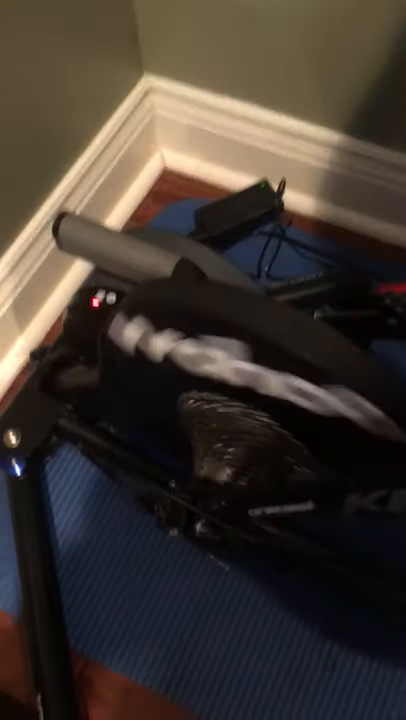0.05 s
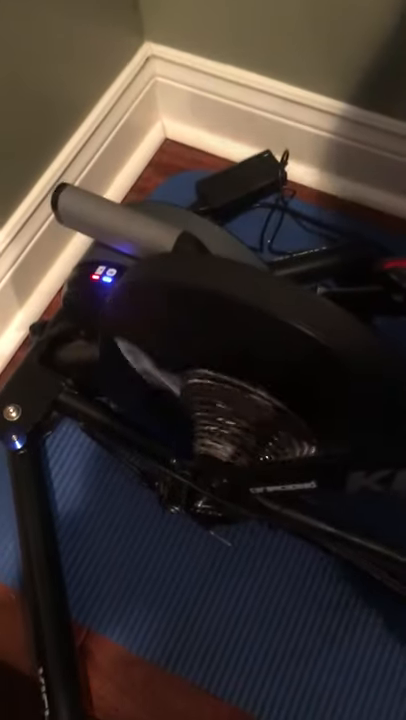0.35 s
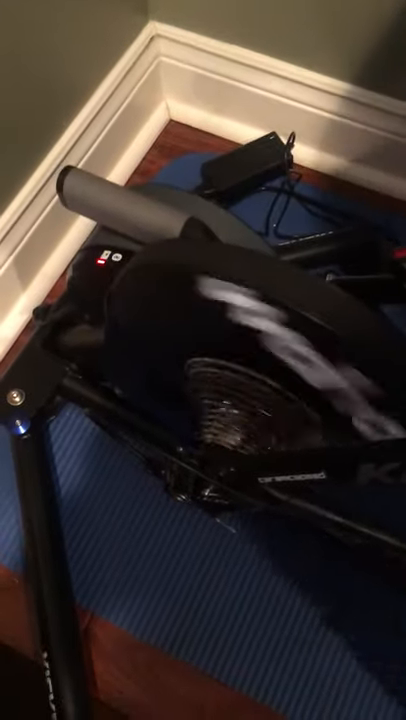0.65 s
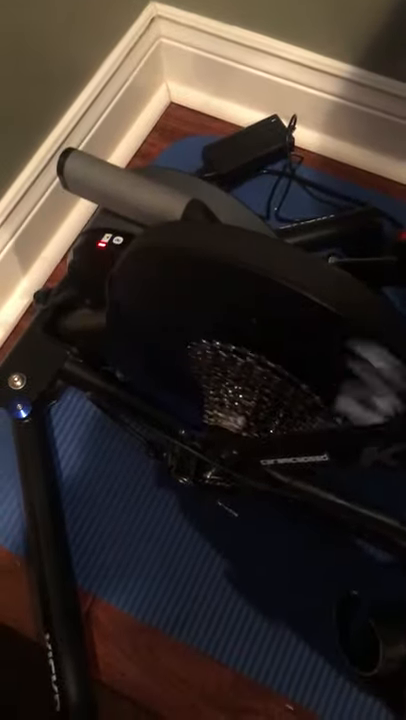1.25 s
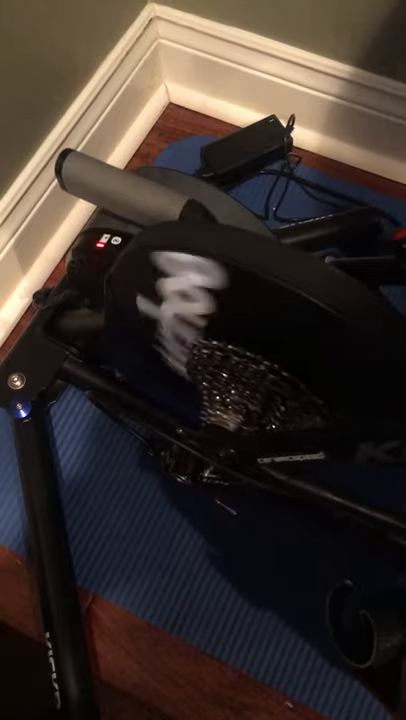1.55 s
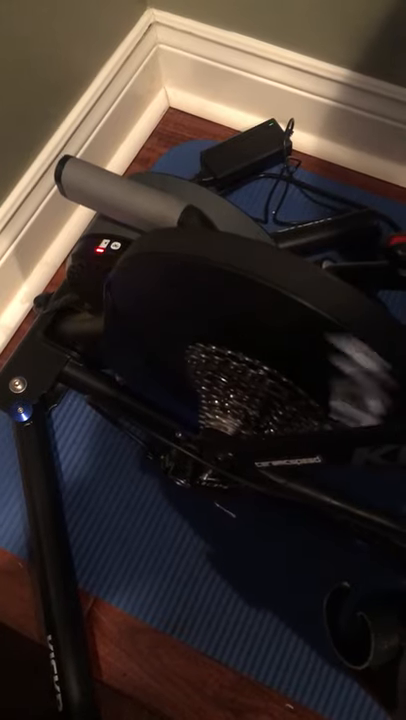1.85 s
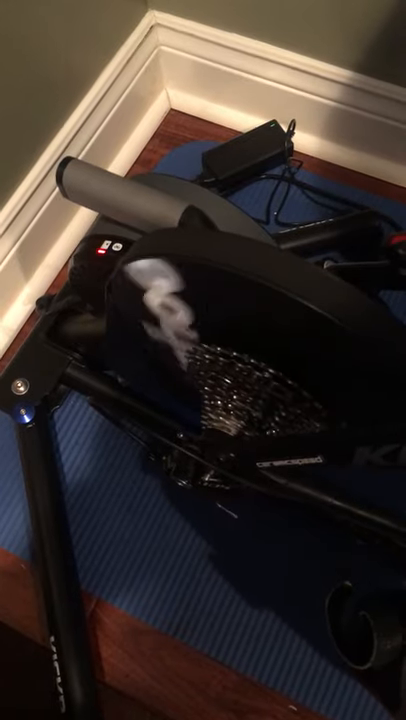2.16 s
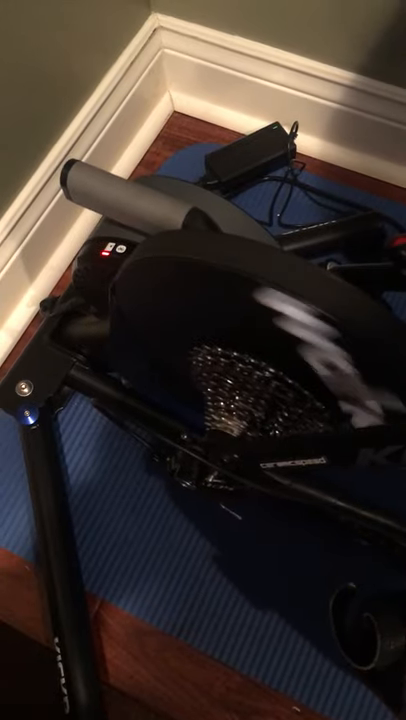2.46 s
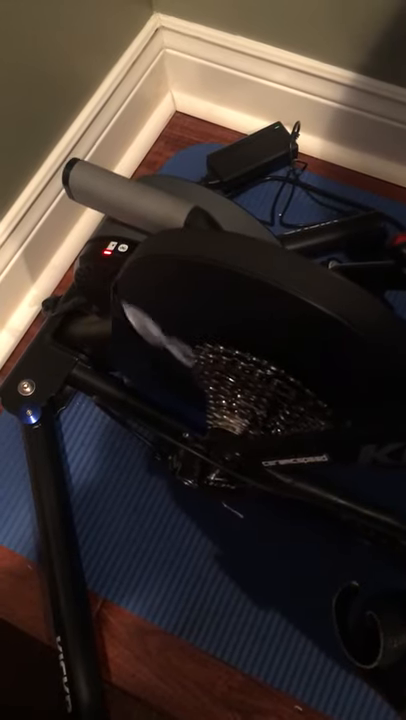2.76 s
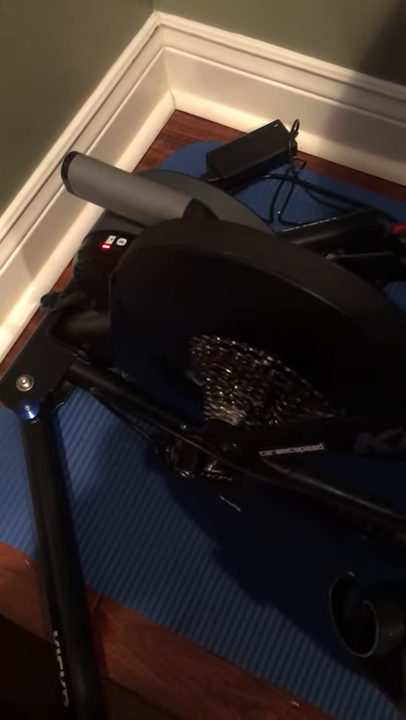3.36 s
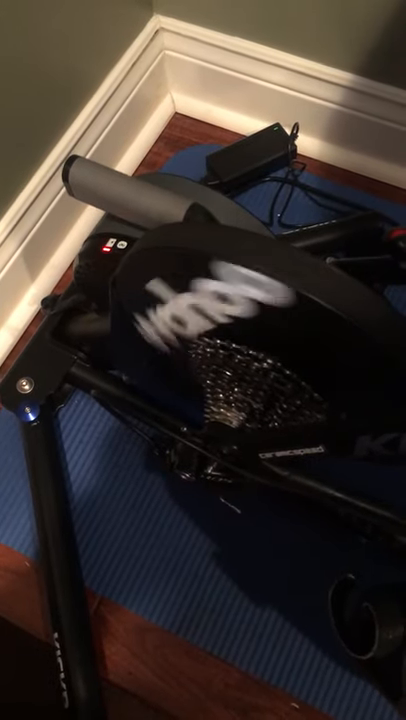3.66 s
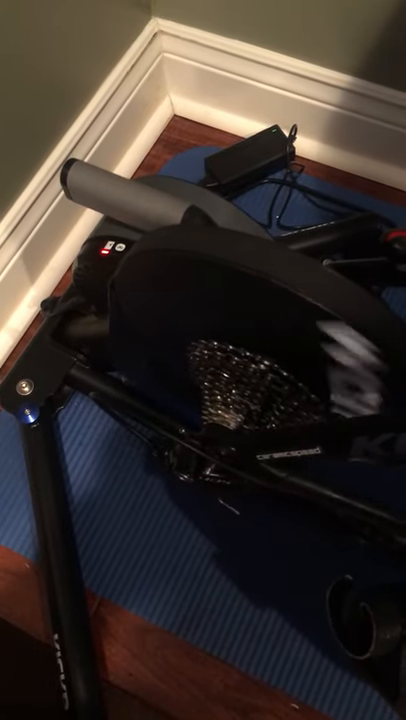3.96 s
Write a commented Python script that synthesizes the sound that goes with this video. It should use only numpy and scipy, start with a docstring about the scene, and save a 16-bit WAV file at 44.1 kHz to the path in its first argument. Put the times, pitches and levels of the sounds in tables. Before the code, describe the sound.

A bicycle freewheel ticks rapidly on an indoor trainer, starting after a second of chain rattle. Underneath, the slowing flywheel hums and knocks softly, heard from about a metre in a small room.

```python
"""A small room with an indoor bike trainer in the corner, heard from about a metre.
The chain rattles while the rider pedals. Then the pedals stop, and the freewheel's pawls (small
catches) tick over its teeth, making the sprockets ring. All along, the heavy flywheel slowly
runs down, humming and knocking in the frame about once a turn."""
import sys
import numpy as np
from scipy import signal
from scipy.fft import rfft, irfft
from scipy.io import wavfile

SR = 44100
rng = np.random.default_rng(int(sys.argv[2]) if len(sys.argv) > 2 else 0)


def put_to_file(sound):
    """Save the sound as 16-bit audio at rate SR, in the file named by the first command-line argument."""
    columns = np.atleast_2d(sound).T  # one column per channel
    safe = np.clip(columns, -1, 1)
    whole_steps = np.round(safe * 32767)
    wavfile.write(sys.argv[1], SR, whole_steps.astype(np.int16))


N = 176400
T = np.arange(N) / SR

# knocks of the turning flywheel: start_s, level_db
FLYWHEEL_KNOCKS = [(0.023, -31), (0.094, -28), (0.168, -29), (0.241, -24), (0.272, -26), (0.314, -22),
                   (0.347, -26), (0.385, -23), (0.424, -26), (0.46, -24), (0.494, -24), (0.536, -24),
                   (0.574, -27), (0.609, -22), (0.642, -19), (0.685, -24), (0.716, -23), (0.757, -28),
                   (0.832, -25), (0.867, -23), (0.905, -21), (0.939, -24), (0.978, -24), (1.059, -25),
                   (1.137, -27), (1.217, -25), (1.297, -29), (1.378, -29), (1.459, -32), (1.543, -31),
                   (1.63, -28), (1.715, -29), (1.802, -29), (1.842, -30), (1.931, -29), (2.02, -27),
                   (2.111, -30), (2.194, -28), (2.25, -32), (2.342, -30), (2.434, -32), (2.474, -33),
                   (2.528, -31), (2.619, -37), (2.666, -33), (2.761, -35), (2.853, -32), (2.954, -37),
                   (3.004, -35), (3.046, -35), (3.203, -37), (3.293, -36), (3.393, -33), (3.493, -35),
                   (3.549, -31), (3.651, -29), (3.756, -28), (3.863, -25), (3.967, -26)]
# the dull tone of the housing when it is struck: pitch_hz, gain_db
HOUSING_TONE = [(500, -34.5), (930, 1.5), (1100, 3.5), (1300, 6), (1480, -6.5), (1720, 5.5), (2000, 3.5),
                (2650, 2), (3000, -7.5), (4500, -7), (7000, -18.5)]


def undb(db):
    """Turn decibels into a number to multiply by."""
    return 10 ** (np.asarray(db) / 20)


def unit(x):
    """Scale a sound to an average strength (rms) of 1."""
    return x / np.sqrt(np.mean(x ** 2))


def curve(rows):
    """Join (time_s, value) rows by straight lines."""
    return np.interp(T, *np.array(rows).T)


def noise():
    """An even hiss: white noise."""
    return rng.standard_normal(N)


def response(hz, rows):
    """Look up the gain at given pitches in a (pitch_hz, gain_db) table."""
    pitch_hz, gain_db = np.array(rows).T
    return undb(np.interp(np.log(hz + 1), np.log(pitch_hz), gain_db))


def ring(x, tail):
    """Make every sample of x set off a copy of the tail."""
    return signal.fftconvolve(x, tail)[:N]


def colour(x, rows, size=4096):
    """Filter a sound to the tone of a (pitch_hz, gain_db) table."""
    gains = response(np.arange(size // 2 + 1) * SR / size, rows)
    cepstrum = irfft(np.log(gains))
    # this fold makes the filter ring only after a hit, never before it
    cepstrum[1:size // 2] *= 2
    cepstrum[size // 2 + 1:] = 0
    return ring(x, irfft(np.exp(rfft(cepstrum))))


def taps(times, sizes):
    """One sharp spike at each time."""
    samples = np.clip(np.asarray(times) * SR, 0, N).astype(int)
    return np.bincount(samples, sizes, N + 1)[:N]


def fade(x, decay_s):
    """Give every spike a tail that dies away."""
    return signal.lfilter([1], [1, -np.exp(-1 / (decay_s * SR))], x)


def modes(rows):
    """The notes of a struck object; each falls by 60 dB in its ring_s."""
    t = T[:SR // 2]
    return sum(undb(db) * np.sin(2 * np.pi * hz * t) * np.exp(-np.log(1000) * t / ring_s)
               for hz, db, ring_s in rows)


def room(x, first_echo_s=.0022, ring_s=.093, echo_db=-14.5):
    """The walls add a short wash of echoes."""
    t = T[:SR // 2]
    tail = rng.standard_normal(len(t)) * np.exp(-np.log(1000) * t / ring_s) * (t > first_echo_s)
    return x + undb(echo_db) * ring(x, tail / np.sqrt(np.sum(tail ** 2)))


def cover(x, ring_db=-3):
    """The plastic cover rings along with sound that passes through it."""
    # notes of the cover: pitch_hz, level_db, ring_s
    cover_notes = [(886, -15, 0.3), (934, 10, 0.033), (1008, -6.5, 0.34), (1265, -2.5, 0.027),
                   (1364.6, -5, 0.16), (1542, -5, 0.19), (1705, -6, 0.11), (1799, 6.5, 0.027),
                   (2056, -3, 0.084), (2213, 0, 0.075), (2750, 17.5, 0.02)]
    ringing = unit(ring(x, modes(cover_notes)))
    return unit(unit(x) + undb(ring_db) * ringing)


def floor_boom(level_db=-46.5):
    """The floor under the trainer shakes faintly and unevenly."""
    # tone of the floor: pitch_hz, gain_db
    floor_tone = [(20, -59), (32, -27), (43, -40), (52, -12), (62, 10.5), (73, -26.5), (85, -6.5),
                  (106, -13), (125, -17.5), (200, -36)]
    return unit(colour(noise(), floor_tone)) * undb(level_db)


def belt_whirr(gain_db=-3.5):
    """The belt and moving air hiss through the cover."""
    # tone of the whirr: pitch_hz, gain_db
    whirr_tone = [(150, -3), (300, -38), (520, -13.5), (700, -37), (820, -10), (950, -1), (1100, -4),
                  (1340, -1), (1470, -5), (1700, -6), (1950, -4), (2250, -4), (2650, -10.5), (2900, -11),
                  (4300, -7.5), (7000, -11), (16000, -20.5)]
    # its rise and fall: time_s, level_db
    whirr_levels = [(0.0, -38), (0.52, -38), (0.92, -42), (3.12, -47), (3.34, -43), (4.0, -43)]
    return cover(colour(noise(), whirr_tone)) * undb(curve(whirr_levels) + gain_db)


def shaft_hum(speed, turns, fifth_boost_db=7, gain_db=-.5):
    """The shaft hums at multiples of its turning rate: the fifth leads, then the sixth as it slows."""
    # how well frame and floor carry each pitch: pitch_hz, gain_db
    hum_tone = [(30, -30), (42, -8), (52, -22.5), (60, 8.5), (67, 5), (76, -6), (88, -23), (107, 1.5),
                (125, -17.5), (160, -8)]
    # rise and fall of the hum: time_s, level_db
    hum_levels = [(0.0, -39.5), (0.62, -38.5), (0.69, -43.5), (0.9, -36), (1.84, -37), (1.86, -42),
                  (2.1, -37.5), (2.13, -42.5), (3.04, -40.5), (3.84, -44.5), (3.95, -48), (4.0, -36)]
    multiples = np.arange(3, 14)
    gains = [response(k * speed, hum_tone) * undb(fifth_boost_db * (k == 5)) for k in multiples]
    hum = sum(g * np.sin(2 * np.pi * (k * turns + rng.random())) for k, g in zip(multiples, gains))
    strength = np.sqrt(sum(g ** 2 for g in gains) / 2)
    return hum / strength * undb(curve(hum_levels) + gain_db)


def surge(depth=.3, rise_s=.0061, decay_s=.03):
    """A gain that swells at each knock and sinks between them."""
    times = np.array(FLYWHEEL_KNOCKS)[:, 0]
    swell = fade(fade(taps(times, np.ones(len(times))), rise_s), decay_s)
    return unit(1 - depth + depth * unit(swell))


def bearing_rumble(turns, repeat_share=.6, gain_db=.5):
    """Belt and bearings rumble, partly from bumps that come round again every turn."""
    # tone of the rumble: pitch_hz, gain_db
    rumble_tone = [(40, -79), (90, -42), (150, -25), (200, -13), (235, -7.5), (258, -4), (280, -1),
                   (297, 4), (320, -20), (360, -17), (405, -10.5), (470, -31.5), (520, -27.5), (630, -21),
                   (800, -29), (1500, -61.5)]
    # its rise and fall: time_s, level_db
    rumble_levels = [(0, -37.5), (.3, -34.5), (.9, -33.5), (1.3, -37.5), (1.6, -39.5), (2.3, -41),
                     (2.8, -43.5), (3.25, -45), (4, -38)]
    bumps = rng.standard_normal(256)
    track = np.interp(turns % 1, np.arange(len(bumps)) / len(bumps), bumps)
    repeating = np.sqrt(repeat_share) * unit(colour(track, rumble_tone))
    fresh = np.sqrt(1 - repeat_share) * unit(colour(noise(), rumble_tone))
    return (repeating + fresh) * surge() * undb(curve(rumble_levels) + gain_db)


def flywheel():
    """The slowing wheel hums, rumbles and whirrs."""
    # speed of the wheel: time_s, turns_per_s
    wheel_speeds = [(0, 13.65), (.75, 13.55), (1.0, 13.05), (1.3, 12.3), (1.8, 11.4), (2.4, 10.75),
                    (3.0, 10.25), (3.7, 9.65), (4, 9.4)]
    speed = curve(wheel_speeds)
    turns = np.cumsum(speed) / SR
    return shaft_hum(speed, turns) + bearing_rumble(turns) + belt_whirr()


def frame_knocks(gain_db=-9.5, rattle_size=.023, rattle_s=.0061, low_cut_hz=170):
    """Each knock, with a short rattle after it, rings the frame."""
    # notes of the frame: pitch_hz, level_db, ring_s
    frame_notes = [(235, -13, .1), (268, -4, .11), (296, 0, .14), (385, -11, .06), (408, -3, .1),
                   (445, -12, .05), (560, -19, .04), (630, -12, .07), (776, -15, .07), (988, -20, .07)]
    times, level_db = np.array(FLYWHEEL_KNOCKS).T
    blows = taps(times, undb(level_db + gain_db))
    rattle = rattle_size * fade(blows, rattle_s) * noise()
    frame = ring(blows + rattle, modes(frame_notes))
    return signal.sosfilt(signal.butter(2, low_cut_hz, "high", fs=SR, output="sos"), frame)


def chain_clatter(peak_s=.645, width_s=.006, level_db=-35.5):
    """The chain gives one short, dull clatter."""
    burst = np.exp(-.5 * ((T - peak_s) / width_s) ** 2)
    return unit(colour(noise(), HOUSING_TONE)) * undb(level_db) * burst


def chain_chinks():
    """Loose links give short metal pings."""
    # the pings: start_s, level_db, pitch_hz, ring_s
    pings = [(.262, -33, 9380, 0.04), (.283, -33, 9380, 0.038), (.405, -36, 5600, 0.082),
             (.533, -36, 4126, 0.063), (0.551, -38, 4126, 0.15), (0.774, -31, 9380, 0.043)]
    return sum(ring(taps([at], [1.]), modes([(hz, db, ring_s)])) for at, db, hz, ring_s in pings)


def chain_rattle(rollers_per_s=260, scatter_db=5, snap_db=-6.5):
    """The pulled chain's rollers patter onto the teeth; a few links snap louder."""
    # rise and fall of the patter: time_s, level_db
    patter_levels = [(0, -38), (.17, -42), (.28, -41.5), (.45, -42), (.62, -37.5), (.72, -42), (.84, -38),
                     (.89, -53), (.93, -62), (1.0, -100)]
    # tone of the chain: pitch_hz, gain_db
    chain_tone = [(880, -16), (1500, -3), (1700, -18), (2200, 1), (2720, -14), (3180, -4), (3760, -6.5),
                  (4180, 0.5), (4710, -4), (5090, -9.5), (6690, -1.5), (7450, -9.5), (8790, -5),
                  (9510, -2.5), (10200, -11), (11100, -8), (15500, -6)]
    # the loudest links: start_s, level_db
    loud_links = [(0.0578, -34), (0.125, -26), (0.185, -30), (0.2292, -22), (0.282, -25), (0.2997, -38),
                  (0.3301, -27), (0.467, -27), (0.5536, -20), (0.604, -20), (0.7382, -25), (0.806, -22),
                  (0.8295, -38), (0.852, -26)]
    hits = (rng.random(N) < rollers_per_s / SR) * undb(scatter_db * np.clip(noise(), -2, 2))
    patter = unit(np.sqrt(fade(hits ** 2, decay_s=.0019))) * undb(curve(patter_levels))
    times, level_db = np.array(loud_links).T
    snaps = fade(taps(times, undb(level_db + snap_db)), decay_s=.003)
    return unit(colour(noise(), chain_tone)) * np.hypot(patter, snaps)


def pawl_crack(blows, rise_s, decay_s=.0044, repeat_share=.24):
    """A landing pawl makes a bright crack, partly the same each time and partly new."""
    # tone of the crack: pitch_hz, gain_db
    crack_tone = [(2000, -35), (3300, -18), (4200, -9), (5000, -7), (5550, 4), (6200, -7), (7300, -8),
                  (8200, -3), (9200, 3), (9850, 4), (10400, -5), (11500, -4), (12600, -4), (13900, 0),
                  (14900, -4), (16000, -8)]
    t = T[:SR // 10]
    burst = rng.choice([-1., 1.], len(t)) * np.exp(-t / decay_s) * (1 - np.exp(-t / rise_s))
    repeating = np.sqrt(repeat_share) * unit(ring(blows, burst))
    energy = fade(fade(blows ** 2, rise_s), decay_s / 2)
    fresh = np.sqrt(1 - repeat_share) * unit(np.sqrt(energy) * np.sign(noise()))
    return unit(colour(repeating + fresh, crack_tone))


def sprocket_ring(pawls, force, scatter_db=1.3):
    """The pawls ring the sprockets, with a different mix of notes at every tooth."""
    # notes of the sprockets: pitch_hz, level_db, ring_s
    sprocket_notes = [(3714, -20, .19), (5368, -14, .04), (5466, -13, .08), (5590, -11, .03),
                      (5720, -14, .03), (8755, -16, .04), (9141, 0, .068), (12122, -23, .1),
                      (12822, -20, .06), (13775, -13, .08), (14675, -24, .1)]
    mixes = force * undb(scatter_db * rng.standard_normal((len(force), len(sprocket_notes))).T)
    ringing = np.zeros(N)
    for note, mix in zip(sprocket_notes, mixes):
        blows = sum(taps(times, sizes * mix) for times, sizes in pawls)
        ringing += ring(blows, modes([note]))
    return unit(ringing)


def housing_thud(blows, rise_s=.004):
    """Each click also shakes the housing, a duller sound heard through the cover."""
    swell = fade(fade(blows, rise_s), rise_s)
    return cover(colour(swell * noise(), HOUSING_TONE))


def freewheel(coast_s=.929, rise_s=.00018, gap_s=.0022, jitter_s=.0002, second_db=1.5, scatter_db=.2):
    """Once the pedals stop, two pawls drop off each tooth, one just after the other."""
    # tick rate, swinging as the pedals rock to rest, then following the wheel: time_s, teeth_per_s
    tooth_rates = [(0.929, 27.81), (0.99, 40.01), (1.075, 30.17), (1.15, 49.45), (1.2, 47.48),
                   (1.25, 40.19), (1.33, 40.43), (1.42, 32.34), (1.56, 37.12), (1.68, 45.28), (1.86, 33.59),
                   (2.02, 41.51), (2.17, 31.92), (2.3, 38.74), (2.45, 36.2), (2.75, 35.39), (3.3, 33.9),
                   (4.0, 31.87)]
    # where the pawls drop hardest: time_s, extra_db
    hard_drops = [(.961, 2), (.988, 1.5), (1.103, 2.5), (1.259, 2), (1.358, 2), (1.446, 2), (1.476, 3),
                  (1.611, 3), (1.915, 2.5), (2.348, 3), (2.567, 2), (2.623, 1.5), (2.877, 1.5),
                  (3.049, 1.5), (3.166, 1.5), (3.253, 2), (3.312, 2), (3.431, 1.5), (3.581, 2),
                  (3.642, 1.5), (3.672, 1.5), (3.733, 2), (3.95, 1.5)]
    # loudness of the ticking: time_s, level_db
    tick_levels = [(.93, -38.5), (1.1, -38), (1.25, -37.5), (1.6, -38), (2.1, -37.5), (2.7, -38),
                   (3.2, -38), (4, -38)]
    teeth_passed = np.cumsum(curve(tooth_rates) * (T >= coast_s)) / SR
    teeth = np.arange(int(teeth_passed[-1]) + 1)
    times = T[np.searchsorted(teeth_passed, teeth, side="right")] - rise_s
    hard_teeth = [np.argmin(abs(times - at)) for at, _ in hard_drops]
    force = undb(np.bincount(hard_teeth, [db for _, db in hard_drops], len(times)))
    first_luck, second_luck, lag = rng.uniform(-1.2, 1, (len(times), 3)).T * np.sqrt(3)
    first_pawl = (times, force * undb(scatter_db * first_luck))
    second_pawl = (times + gap_s + jitter_s * lag, force * undb(second_db + scatter_db * second_luck))
    blows = taps(*first_pawl) + taps(*second_pawl)
    crack = pawl_crack(blows, rise_s)
    sprockets = undb(-1.5) * sprocket_ring([first_pawl, second_pawl], force)
    housing = undb(-11.5) * housing_thud(blows)
    return (crack + sprockets + housing) * undb(curve(tick_levels))


def scene():
    """The flywheel runs throughout; over it comes first the chain, then the freewheel."""
    background = flywheel() + floor_boom() + frame_knocks()
    chain = chain_clatter() + chain_chinks() + chain_rattle()
    return (background + room(chain + freewheel()))[None]


def record(dry, top_hz=15720):
    """Cut away the very highest treble."""
    return signal.sosfilt(signal.ellip(10, .2, 70, top_hz, fs=SR, output="sos"), dry)


dry = scene()
out = record(dry)
put_to_file(out)
```